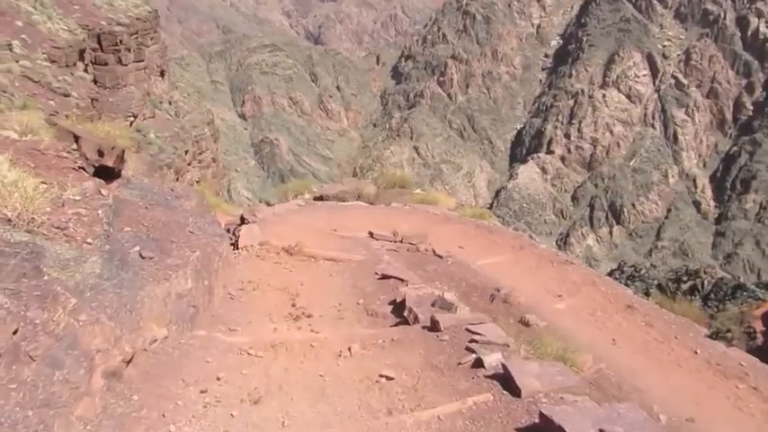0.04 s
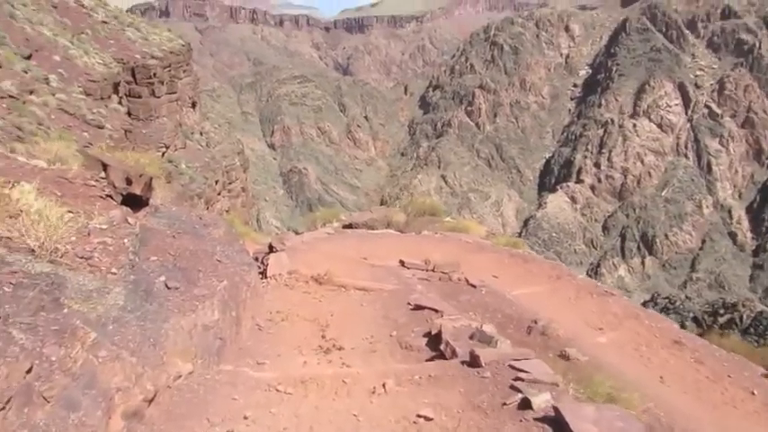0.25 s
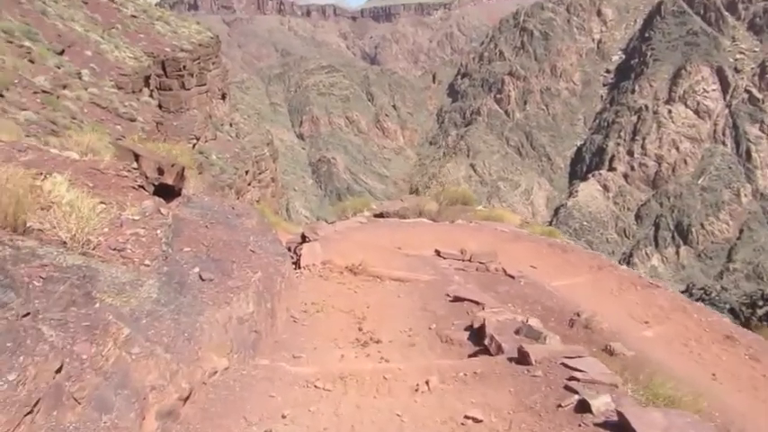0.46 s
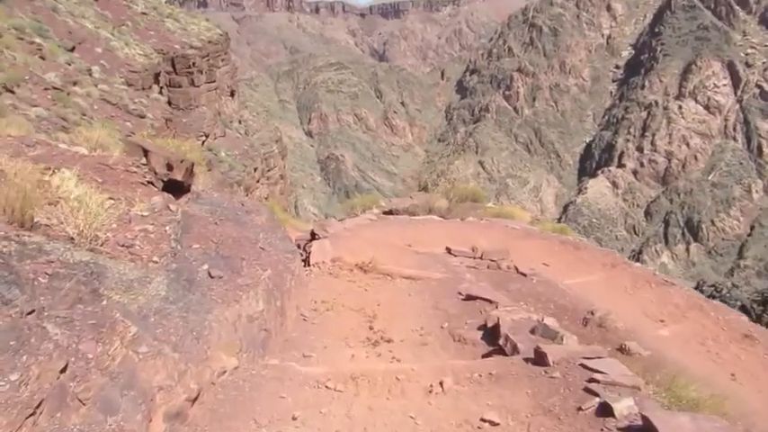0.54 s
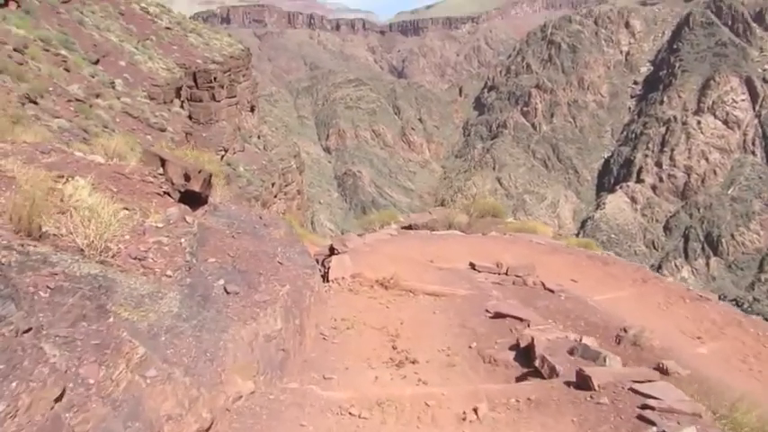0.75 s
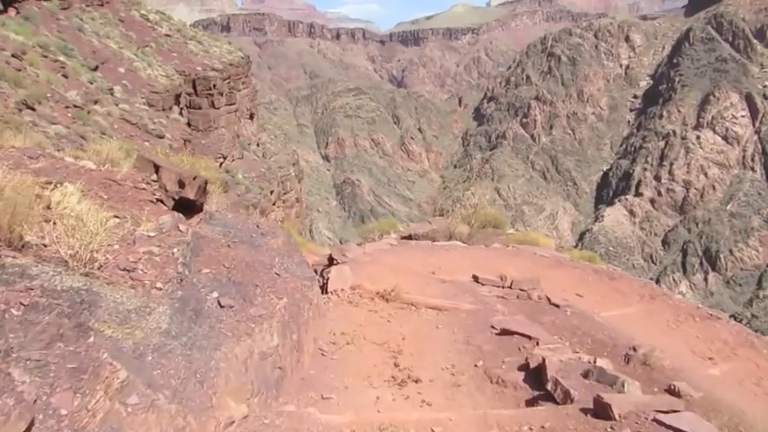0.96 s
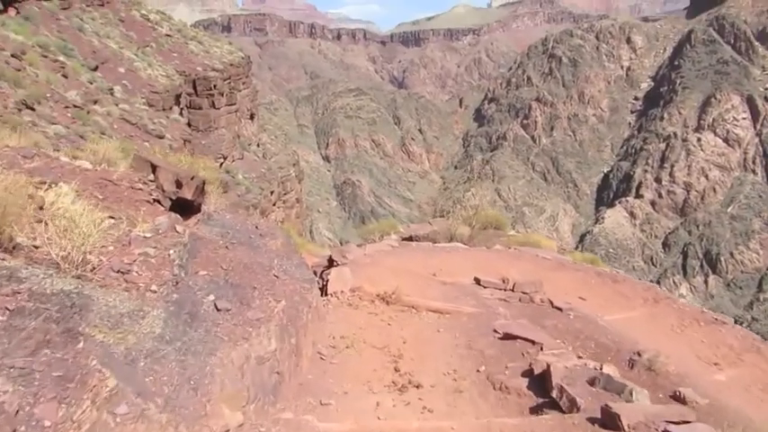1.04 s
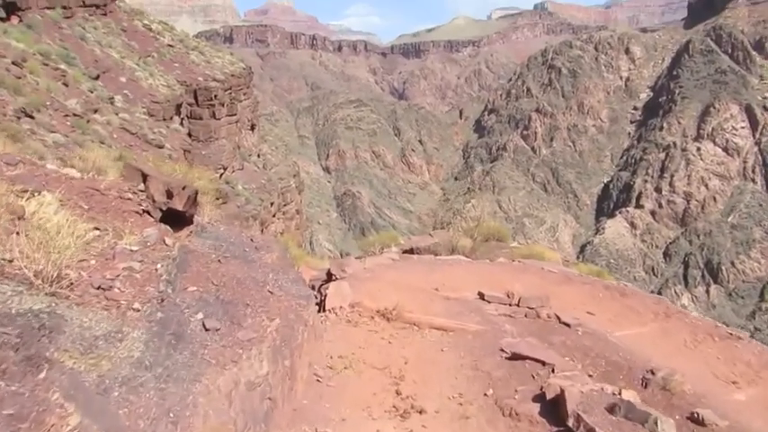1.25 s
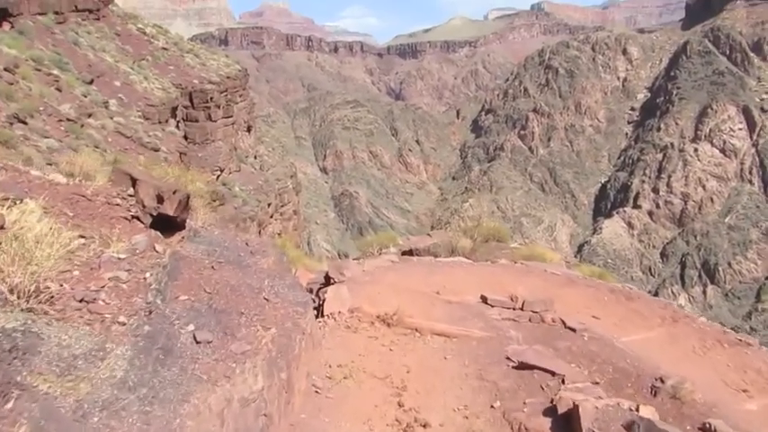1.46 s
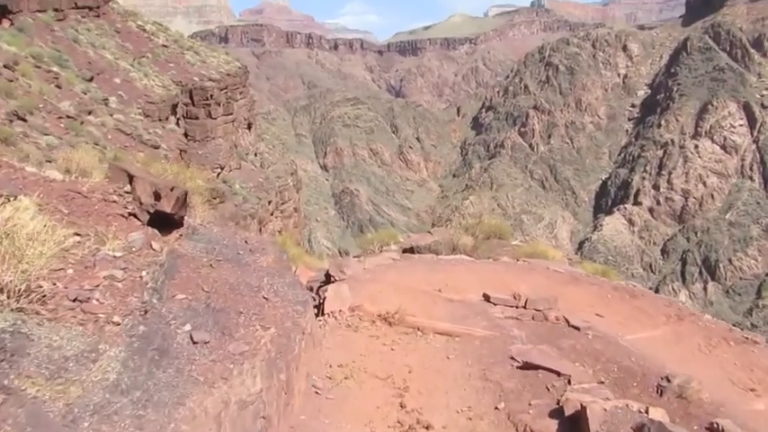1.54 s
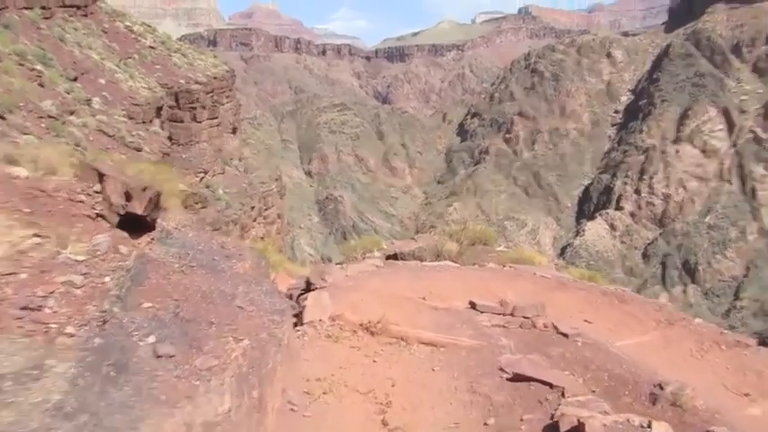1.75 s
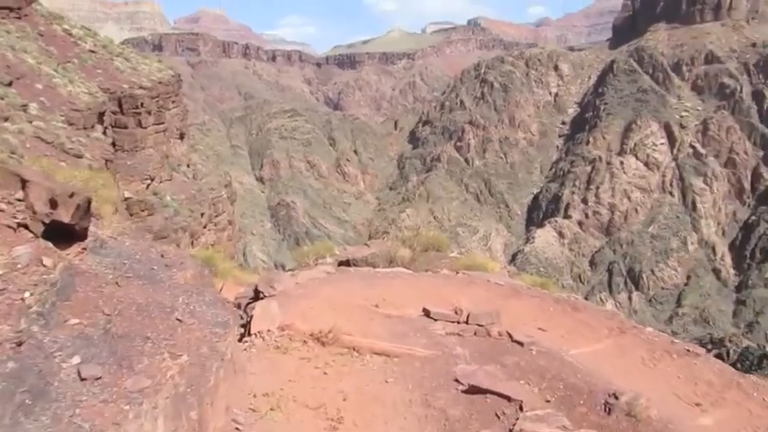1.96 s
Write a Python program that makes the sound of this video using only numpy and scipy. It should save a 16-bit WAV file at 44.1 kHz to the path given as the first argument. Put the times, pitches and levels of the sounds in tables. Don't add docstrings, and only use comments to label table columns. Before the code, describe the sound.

Strong gusts thump right on the microphone, easing around the middle and returning near the end; beneath, a walker's boots crunch gravel about every half second, stones shifting and pebbles ticking in open air.

```python
import sys
import numpy as np
from scipy import signal
from scipy.fft import rfft, irfft
from scipy.io import wavfile
from scipy.ndimage import uniform_filter1d, minimum_filter1d

SR = 44100
rng = np.random.default_rng(int(sys.argv[2]) if len(sys.argv) > 2 else 0)


def boost(x):
    u = np.asarray(x, float) / 20
    return 10 ** u


def wav_record(signal):
    frames = np.transpose(np.atleast_2d(signal))
    bounded = np.clip(frames, -1, 1)
    quanta = np.round(bounded * 32767).astype(np.int16)
    wavfile.write(sys.argv[1], SR, quanta)


N = 88376


def rms_one(x):
    return x / np.sqrt(np.mean(x ** 2) + 1e-20)


def in_time(rows):
    s, *columns = np.transpose(rows)
    return [np.interp(np.arange(N) / SR, s, column) for column in columns]


def at_hz(points, hz):
    point_hz, point_db = np.array(points).T
    return np.interp(np.log(hz), np.log(point_hz), point_db)


def drift(rate_hz):
    r = np.exp(-80 * np.pi * rate_hz / SR)
    noise = rng.standard_normal(N // 40 + 2002)
    slow = signal.lfilter([1], [1, -2 * r, r * r], noise)[2000:]
    return np.interp(np.arange(N) / 40, np.arange(len(slow)), rms_one(slow))


def ring(hits, hz, t60_s):
    r = boost(-60 / (t60_s * SR))
    w = 2 * np.pi * hz / SR
    return signal.lfilter([0, np.sin(w)], [1, -2 * r * np.cos(w), r * r], hits + 1e-18)


def random_clicks(per_s, spread_db, shape):
    sizes = boost(spread_db * np.minimum(rng.exponential(1, shape), 4))
    sizes = sizes * rng.choice([-1, 1], shape)
    return sizes * (rng.random(shape) < per_s / SR)


def swirl(hz, turns):
    width_s = turns / hz * .4
    reach = int(5 * width_s * SR)
    t = np.arange(-reach, reach + 1) / SR
    return np.exp(-.5 * (t / width_s) ** 2 + 2j * np.pi * hz * t)


def ports(common, opposite):
    return np.array([common + opposite, common - opposite])


# (pitch_hz, level_db)
SHARED_WIND = [(30, -13.5), (150, -16.5), (400, -12.5), (900, -4.5), (2000, 6.5)]


def roll_past(rows, passing=()):
    rows = list(passing) + list(rows)
    phase_turns = rng.random((len(rows), 2))
    phase_turns[:len(passing)] = [.5, 0]
    out = np.zeros((2, N + 2 * SR))
    for (s, db, hz, turns), start in zip(rows, phase_turns):
        wave = swirl(hz, turns) * np.exp(2j * np.pi * start)[:, None]
        wave = wave * [[boost(at_hz(SHARED_WIND, hz))], [1]]
        i = int((s + 1) * SR) - wave.shape[1] // 2
        out[:, i:i + wave.shape[1]] += boost(db) * wave.real
    return ports(*out[:, SR:SR + N])


# (middle_s, peak_db, pitch_hz, turns)
PASSING_EDDIES = [
    (0, -11, 200, 1.0),
    (2.004, -14, 120, 1.0),
]
# (middle_s, peak_db, pitch_hz, turns)
SLOW_THUMPS = [(0.072, -12.5, 138, 5), (0.078, -9, 63, 1.3), (0.17, -14, 135, 0.57), (0.259, -14, 63.1, 4),
               (0.332, -13, 132, 0.47), (0.373, -23.5, 102, 1.16), (0.594, -10.5, 79, 1.5),
               (0.623, -6, 137.5, 2.25), (0.637, -6.5, 89.3, 0.41), (0.651, -4, 138.6, 0.87),
               (0.672, -10.5, 101.5, 0.6), (0.743, -8.5, 118, 1.5), (0.773, -14.5, 154, 1.5),
               (1.252, -6, 161, 0.32), (0.84, -18.5, 92.6, 1.4), (1.601, -18.5, 84, 3.6),
               (1.706, -6, 57.9, 0.39), (1.733, -18.5, 95, 9.8), (1.854, -8, 98.4, 2),
               (1.882, -18, 132, 0.68), (1.906, -6.5, 114, 0.33), (1.928, -20, 97, 2.5),
               (1.953, -18, 156, 1.3), (1.99, -2.5, 147, 0.39)]
# (middle_s, peak_db, pitch_hz, turns)
SHARP_BUFFETS = [(0.02, -2, 220, 0.63), (0.034, -6, 186, 1.27), (0.065, -9, 259, 0.38),
                 (0.074, -8.5, 385, 0.44), (0.07, -5.5, 232, 4.6), (0.114, -11, 190, 0.45),
                 (0.116, -11, 221, 1.6), (0.192, -35, 207, 0.64), (0.249, -22.5, 184, 0.98),
                 (0.26, -7.5, 243, 1.1), (0.577, -13, 177, 1.6), (0.623, -4.5, 245, 1.05),
                 (0.658, -14, 245, 2.3), (0.784, -6.5, 182, 0.49), (1.277, -13, 235, 2.4),
                 (1.429, -3, 182, 0.32), (1.431, -7, 265, 2.7), (1.438, -6, 182, 0.82),
                 (1.506, -19, 350, 2.2), (1.512, -8.5, 228, 2.7), (1.515, -12, 447, 0.47),
                 (1.53, -8.5, 416, 0.41), (1.586, 0.5, 228, 0.62), (1.622, -10.5, 217, 1.5),
                 (1.653, -24, 177, 0.98), (1.704, -13, 238, 1.5), (1.753, -10, 182, 2.15),
                 (1.767, -3.5, 316, 0.72), (1.78, -12.5, 328, 2), (1.793, -8.5, 270, 0.33)]
# (middle_s, peak_db, pitch_hz, turns)
LONE_FLUTTERS = [
    (.246, -25, 683, 3.8),
    (.368, -14.5, 267, 2.44),
    (.49, -16, 292, 2.16),
    (.608, -17.5, 463, 1.1),
    (.87, -14.5, 247, 1.5),
    (.935, -13.5, 292, 0.92),
    (1.207, -15, 193, 0.86),
    (1.306, -21, 130, 0.85),
    (1.475, -18.5, 383, 0.77),
    (1.86, -28.5, 389, 0.78),
]


def big_eddies():
    return roll_past(list(SLOW_THUMPS) + list(SHARP_BUFFETS) + list(LONE_FLUTTERS), PASSING_EDDIES)


# (time_s, level_db, brightness_db_per_octave)
GUSTS = [(0, -29, 5), (.12, -19, 1), (.24, -26.5, 5.5), (.35, -24, -6), (.47, -20, -1.5), (.56, -26, 1.5),
         (.66, -27, 2), (.82, -22.5, -4), (.94, -25, -5.5), (1.06, -26.5, -12), (1.18, -27, -13.5),
         (1.33, -31.5, -8), (1.41, -28, -0.5), (1.53, -21, 1.5), (1.65, -21.5, 0), (1.76, -20.5, -2),
         (1.88, -21, -0.5), (2.0, -26, -5.5)]
# (pitch_hz, level_db_per_hz)
SMALL_EDDY_COLOUR = [(20, -21.5), (70, 5.5), (190, 2.5), (390, -7.5), (730, -33.5), (1340, -58),
                     (2200, -78)]
EDDIES_PER_CYCLE, EDDY_TURNS, EDDY_SPREAD_DB = 0.79, 1.62, 2.0
CLUMP_DB, CLUMP_RATE_HZ = 1.7, 52
SHED_SHARE, SHED_S = 0.62, .012


def breeze(big):
    level_db, bright_db = in_time(GUSTS)
    near = uniform_filter1d(np.gradient(big) ** 2, int(SHED_S * SR))
    shed_db = 10 * np.log10(near / near.mean() + 0.044)
    clump_db = CLUMP_DB * drift(CLUMP_RATE_HZ) + SHED_SHARE * shed_db
    out = np.zeros((2, N))
    for hz in np.geomspace(22, 2000, num=14):
        born = random_clicks(EDDIES_PER_CYCLE * hz, EDDY_SPREAD_DB, N + SR)
        born = born * np.exp(2j * np.pi * rng.random((2, N + SR)))
        eddies = signal.fftconvolve(born, swirl(hz, EDDY_TURNS)[None], "same").real
        eddies = rms_one(eddies[:, SR // 2:SR // 2 + N])
        octaves = max(np.log2(hz / 120), 0)
        gain_db = at_hz(SMALL_EDDY_COLOUR, hz) + octaves * bright_db + clump_db * min(hz / 500, 1)
        gain = boost(gain_db) * np.sqrt(hz / 500)
        out += gain * eddies * [[boost(at_hz(SHARED_WIND, hz))], [1]]
    return ports(*(boost(level_db) * out))


# (pitch_hz, level_db_per_hz)
AIR_COLOUR = [(700, 3.5), (1000, 0), (2000, -7.5), (3200, -13), (5000, -15.5), (8000, -21), (13000, -28)]
# (time_s, level_db)
AIR_LEVEL = [
    (0, -2.5),
    (.6, -3),
    (1.2, 1.5),
    (2, -2),
]
AIR_DB, AIR_WIDTH_DB = -62.5, -1


def air():
    hz = np.maximum(np.arange(N // 2 + 1) * SR / N, 1)
    low_cut = np.minimum(hz / AIR_COLOUR[0][0], 1) ** 2
    tilt = boost(at_hz(AIR_COLOUR, hz)) * low_cut
    common, opposite = rms_one(irfft(rfft(rng.standard_normal((2, N))) * tilt, N))
    return ports(common, boost(AIR_WIDTH_DB) * opposite) * boost(AIR_DB + in_time(AIR_LEVEL)[0])


GRAIN_CYCLES = 7.2


def grains(spectrum, per_s, spread_db, width_db):
    hits = random_clicks(per_s, spread_db, (2, N))
    dealt = rng.integers(0, 10, N)
    out = 0
    for k, hz in enumerate(np.geomspace(spectrum[0][0], spectrum[-1][0], num=10)):
        rung = ring(hits * (dealt == k), hz, GRAIN_CYCLES / hz)
        rung = ring(rung, hz, GRAIN_CYCLES / hz / 2)
        out = out + rms_one(rung) * boost(at_hz(spectrum, hz)) * np.sqrt(hz)
    return ports(*(rms_one(out) * [[np.sqrt(2)], [np.sqrt(2) * boost(width_db)]]))


# (start_s, length_s, stones_db, grit_db, sand_db)
BOOT_LOADS = [(0.025, 0.058, -50, -60, -77), (0.086, 0.057, -52.5, -60, -81.5),
              (0.152, 0.036, -75, -65.5, -74), (0.612, 0.054, -42, -57, -73), (0.655, 0.079, -60, -65, -74),
              (0.746, 0.044, -62, -71, -81.5), (1.036, 0.049, -45, -49.5, -72),
              (1.1, 0.021, -53.5, -55, -84), (1.126, 0.041, -47.5, -57.5, -85),
              (1.162, 0.055, -57, -60, -83), (1.61, 0.094, -46.5, -57, -75),
              (1.683, 0.14, -52, -65.5, -78.5)]
# (pitch_hz, level_db_per_hz)
CRUNCH_COLOUR = [(330, 4), (850, 2), (1350, 3), (1800, -19)]
# (pitch_hz, level_db_per_hz)
GRIT_COLOUR = [(1700, 12), (2300, -4), (3700, -6)]
# (pitch_hz, level_db_per_hz)
SAND_COLOUR = [(4100, -13.5), (5000, 11), (8000, -4.5), (13500, -1.5)]
RISE_SHARE, RELEASE_DB_PER_S = 0.54, 501


def boots():
    t = np.arange(N) / SR
    load = 0
    for s, length_s, *db in BOOT_LOADS:
        rise = np.clip((t - s) / (RISE_SHARE * length_s), 0, 1) ** 2
        release = boost(-RELEASE_DB_PER_S * np.maximum(t - s - length_s, 0))
        load = load + rise * release * boost(np.array(db))[:, None]
    crunch = load[0] * grains(CRUNCH_COLOUR, per_s=2200, spread_db=2.0, width_db=-28.5)
    scrape = load[1] * grains(GRIT_COLOUR, per_s=4000, spread_db=2.2, width_db=-11)
    hiss = load[2] * grains(SAND_COLOUR, per_s=15000, spread_db=0.69, width_db=0.5)
    return crunch + scrape + hiss


# (middle_s, peak_db, pitch_hz)
STONE_SLIPS = [(0.0382, -34.5, 1580), (0.0503, -31, 700.0), (0.075, -30, 770.0), (0.1109, -44, 830),
               (0.1348, -36, 1110.0), (0.1716, -39, 1330.0), (0.2189, -58, 700.0), (0.2469, -30.5, 700.0),
               (0.6332, -29, 750), (0.6404, -38, 780), (0.649, -26.5, 835), (0.656, -41, 695),
               (0.6576, -27.5, 860), (0.6698, -33, 830), (0.6823, -30.5, 1290), (0.702, -37, 1330.0),
               (0.7117, -51, 1110.0), (0.7794, -44.5, 1460.0), (0.8699, -51, 690), (0.9352, -47, 685),
               (1.028, -40, 830), (1.0487, -43, 1010.0), (1.06, -40, 1580), (1.0664, -46, 1210.0),
               (1.077, -32, 710), (1.0874, -42, 910), (1.1098, -44, 1100), (1.1204, -34.9, 1330.0),
               (1.1373, -30.5, 826), (1.1413, -32, 1130), (1.1512, -30.5, 1280), (1.1741, -39.4, 840.0),
               (1.187, -40, 865), (1.261, -34.5, 1020), (1.3424, -49, 686), (1.3796, -42.5, 690),
               (1.4001, -40, 850), (1.6454, -37, 825), (1.6585, -45, 920.0), (1.6724, -29, 755),
               (1.6839, -34.5, 1340), (1.6967, -36.5, 780), (1.7035, -45, 915), (1.7298, -33, 920.0),
               (1.7425, -38.5, 1210.0), (1.7527, -34, 780), (1.7726, -38, 1030), (1.8126, -42, 920.0),
               (1.9896, -55, 704)]
STONE_TURNS, STONE_DB, STONE_EDGE_DB, STONE_WIDTH_DB = 2.42, -3.5, -11, -15.5


def stones():
    out = np.zeros((2, N + SR))
    for (s, db, hz), (start, side) in zip(STONE_SLIPS, rng.random((len(STONE_SLIPS), 2))):
        body_db = db + STONE_DB
        offset = (4 * side - 2) * boost(STONE_WIDTH_DB)
        for level_db, pitch_hz in ((body_db, hz), (body_db + STONE_EDGE_DB, hz * 1.9)):
            wave = swirl(pitch_hz, STONE_TURNS) * np.exp(2j * np.pi * start)
            wave = boost(level_db) * wave.real
            i = int(s * SR) - len(wave) // 2
            out[:, i:i + len(wave)] += wave * [[1], [offset]]
    return ports(*out[:, :N])


# (middle_s, peak_db, pitch_hz, turns)
STRAY_EDDIES = [(.195, -15, 187, 1.04), (.3, -17, 300, 0.57), (.405, -13, 170, 1.1),
                (.716, -17.5, 188, 1.1), (.796, -17.5, 278, 0.74), (.903, -16, 221, 0.87),
                (.962, -17, 200, 0.92), (1.115, -25, 200, 0.84), (1.152, -18, 170, 0.55),
                (1.172, -17, 196, 0.92), (1.37, -21.5, 280, 0.89), (1.395, -16, 110, 1.1),
                (1.604, -13, 380, 0.79), (1.746, -15.5, 300, 0.58), (1.872, -26, 590, 1.1),
                (.075, -18.5, 650, 0.54), (.111, -27, 700, 1), (1.768, -22, 700, 0.67),
                (1.279, -24.5, 437, 1.13), (.813, -18.5, 199, 0.81), (.622, -24, 520, .6)]


def stray_eddies():
    return roll_past(STRAY_EDDIES)


# (start_s, peak_db, pitch_hz)
PEBBLE_KNOCKS = [
    (0.2602, -37.5, 1540),
    (0.327, -45.5, 1380),
    (.3672, -37.5, 1010),
    (.815, -46, 1610),
    (0.905, -42, 1590),
    (0.9852, -36, 1090),
    (1.12, -49, 1510),
    (1.308, -34.5, 1310),
    (1.446, -49, 2560),
    (1.911, -44.5, 1350),
]
PEBBLE_T60_S, PEBBLE_SNAP_DB = .005, -4
BOUNCE_S, BOUNCE_DB = .0012, -12


def pebbles():
    out = np.zeros(N)
    for s, db, hz in PEBBLE_KNOCKS:
        tap = np.zeros(2048)
        tap[0] = boost(db)
        tap[int(BOUNCE_S * SR)] = -boost(db + BOUNCE_DB)
        snap = boost(PEBBLE_SNAP_DB) * ring(tap, hz * 1.78, PEBBLE_T60_S / 3)
        knock = ring(tap, hz, PEBBLE_T60_S) - snap
        i = int(s * SR)
        out[i:i + len(tap)] += signal.lfilter([.5, .5], [1], knock)
    return ports(out, .15 * out)


def scene():
    big = big_eddies()
    wind = big + breeze(big[0] - big[1])
    return wind + air() + boots() + stones() + stray_eddies() + pebbles()


def roll_off(x):
    return signal.sosfilt(signal.butter(12, 14300, fs=SR, output="sos"), x)


# (pitch_hz, width_hz)
TREBLE_GAPS = [(3930, 234), (7850, 100)]
CUTOFF_HZ = 14000
CEILING, LIMIT_SAMPLES = .9, 441


def record(dry):
    for hz, width_hz in TREBLE_GAPS:
        dry = signal.filtfilt(*signal.iirnotch(hz, hz / width_hz, fs=SR), dry)
    dry = signal.sosfiltfilt(signal.butter(6, CUTOFF_HZ, fs=SR, output="sos"), dry)
    peak = np.maximum(np.abs(dry).max(axis=0), CEILING)
    room = minimum_filter1d(CEILING / peak, size=2 * LIMIT_SAMPLES)
    gain = uniform_filter1d(uniform_filter1d(room, size=LIMIT_SAMPLES), size=LIMIT_SAMPLES)
    return roll_off(dry * gain)


dry = scene()
out = record(dry)
wav_record(out)
```